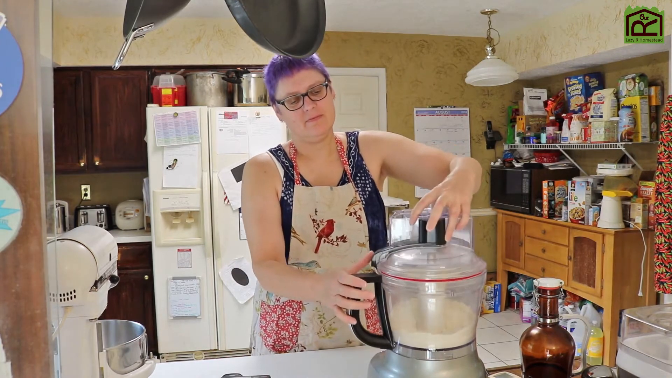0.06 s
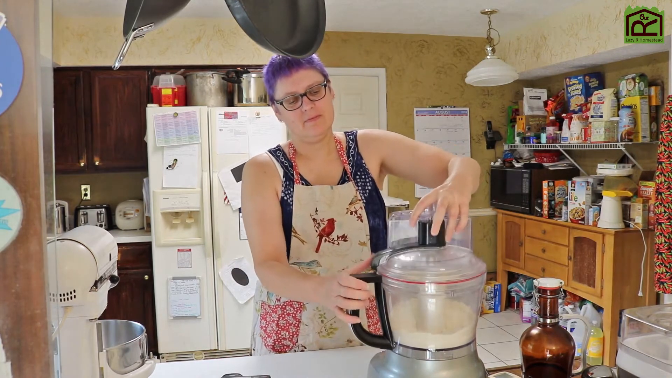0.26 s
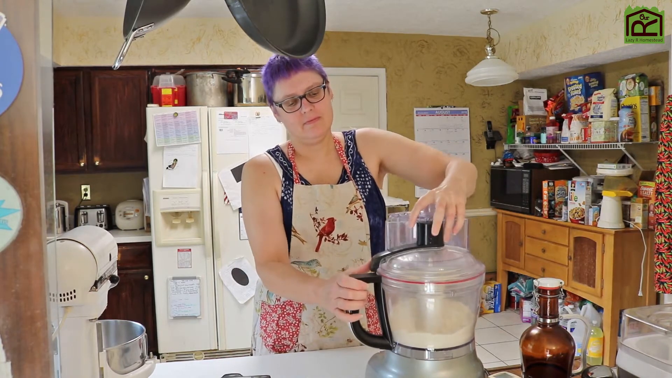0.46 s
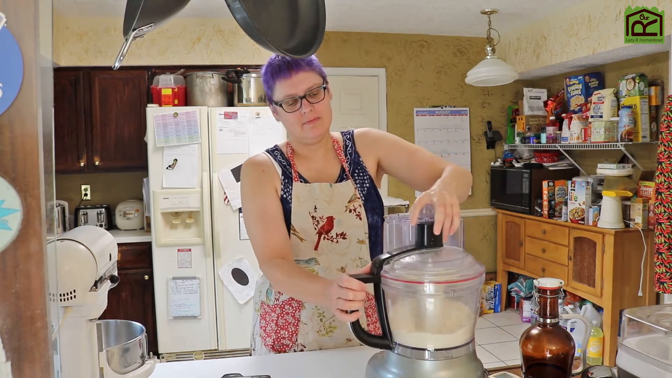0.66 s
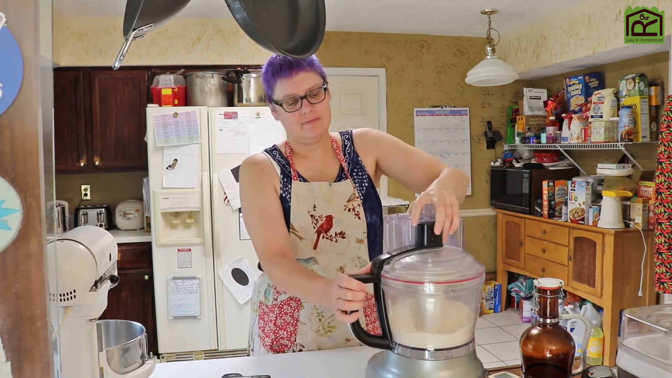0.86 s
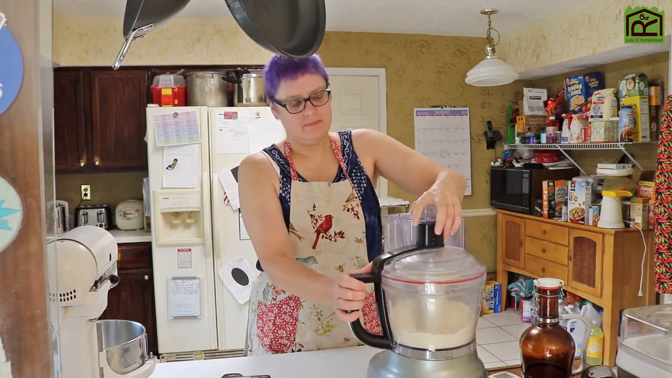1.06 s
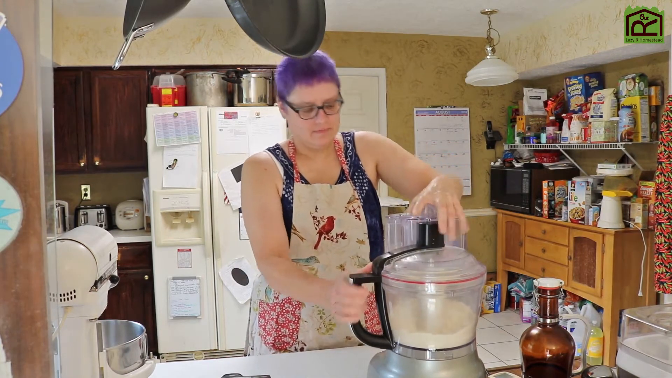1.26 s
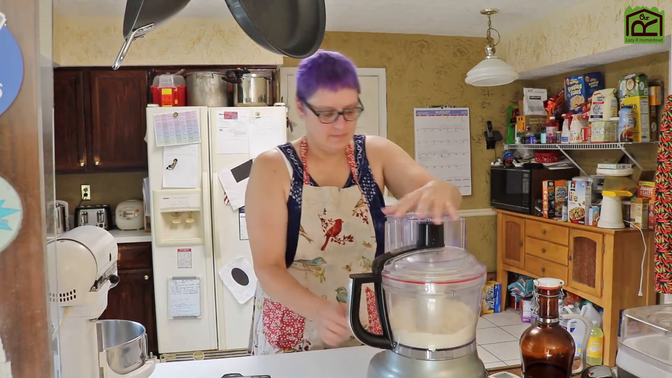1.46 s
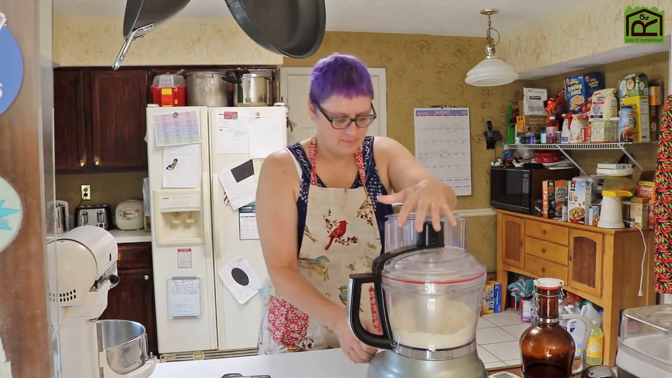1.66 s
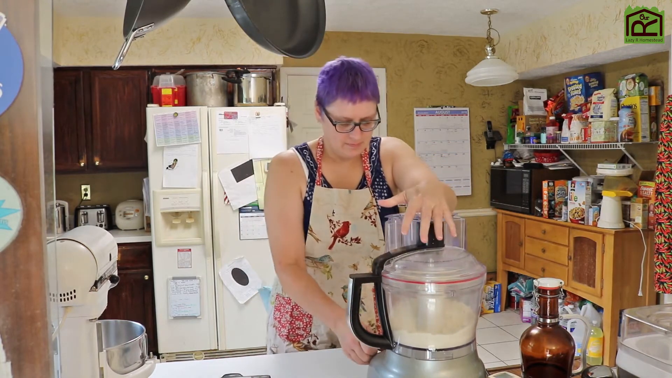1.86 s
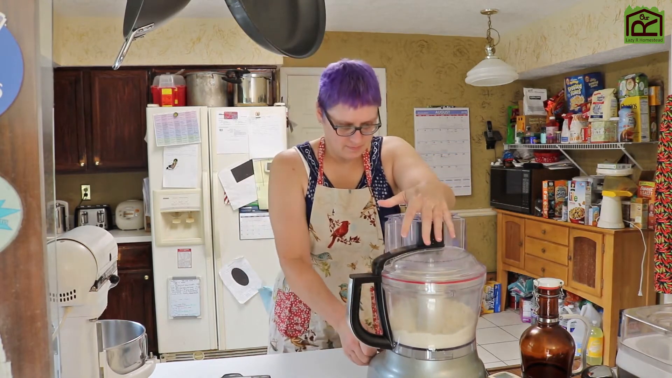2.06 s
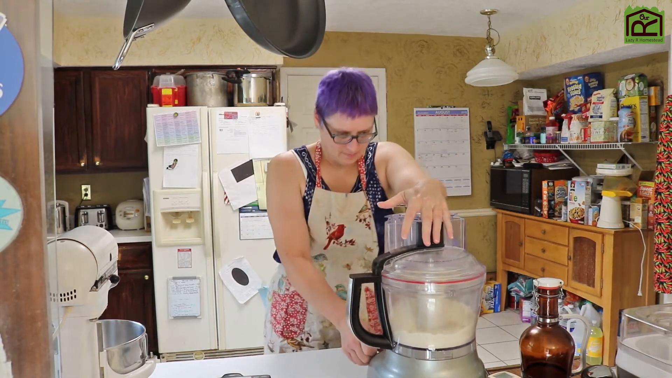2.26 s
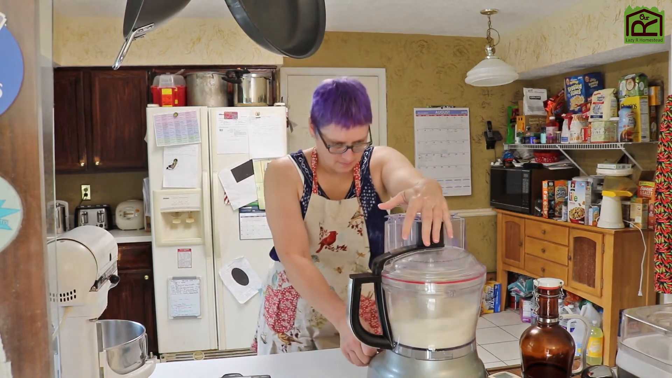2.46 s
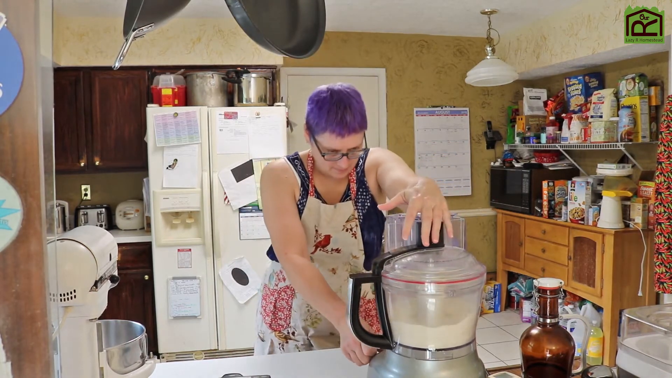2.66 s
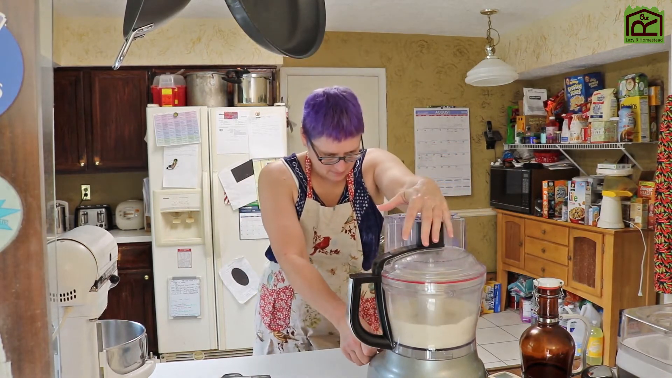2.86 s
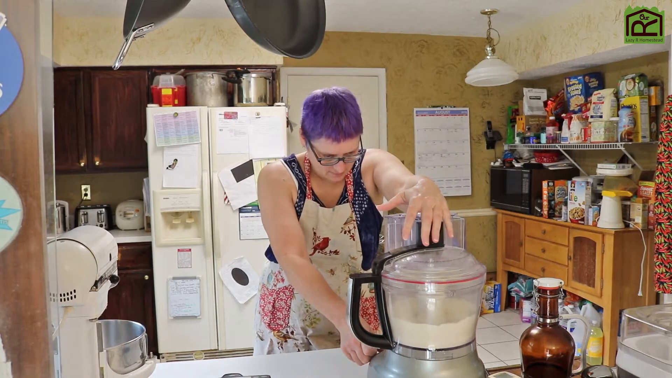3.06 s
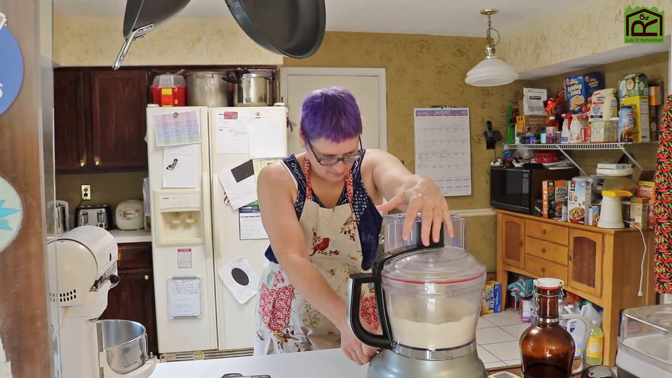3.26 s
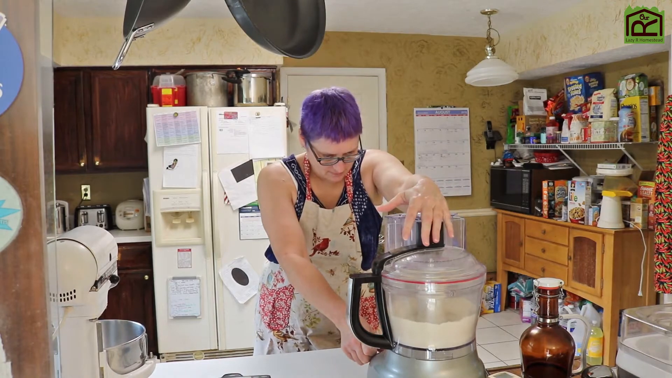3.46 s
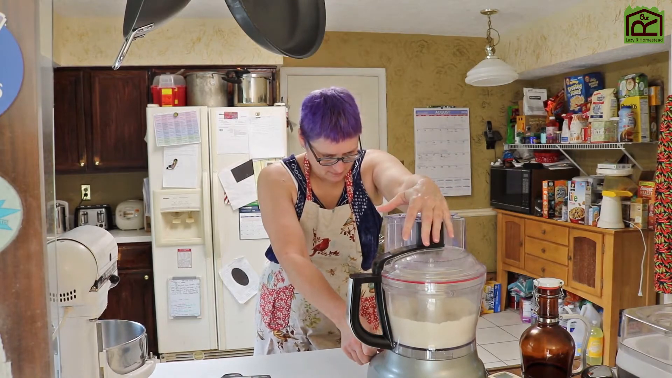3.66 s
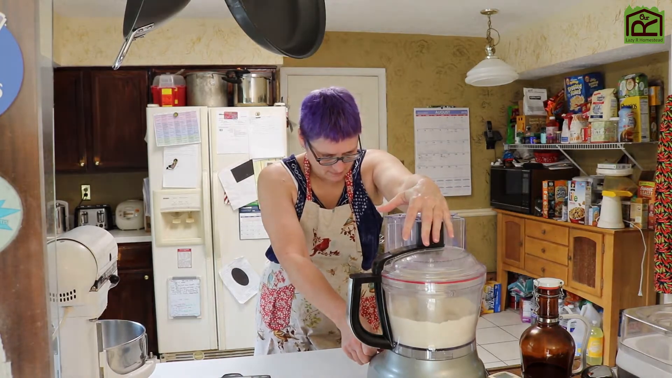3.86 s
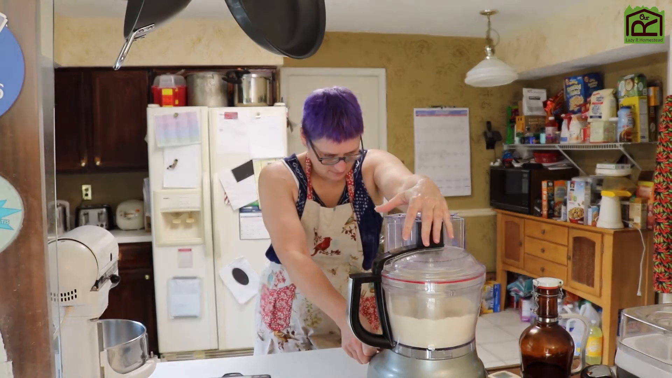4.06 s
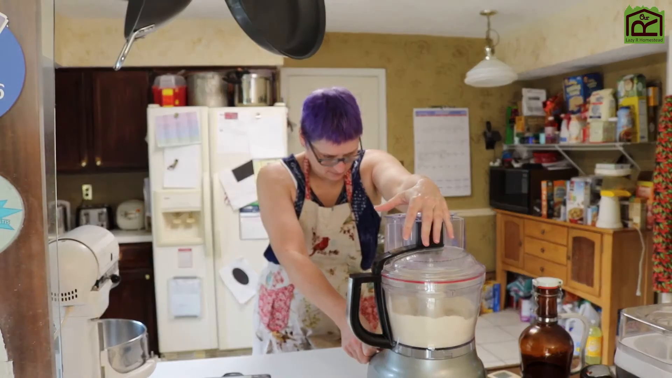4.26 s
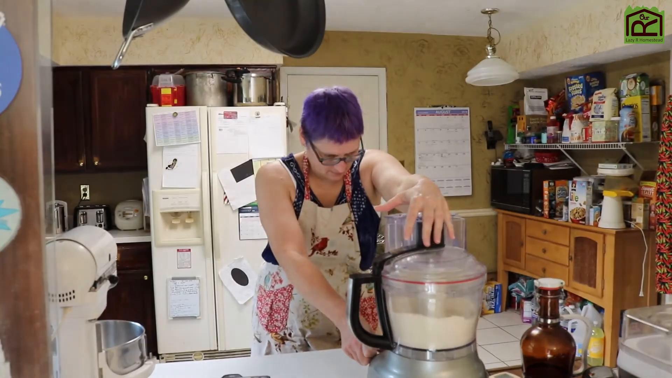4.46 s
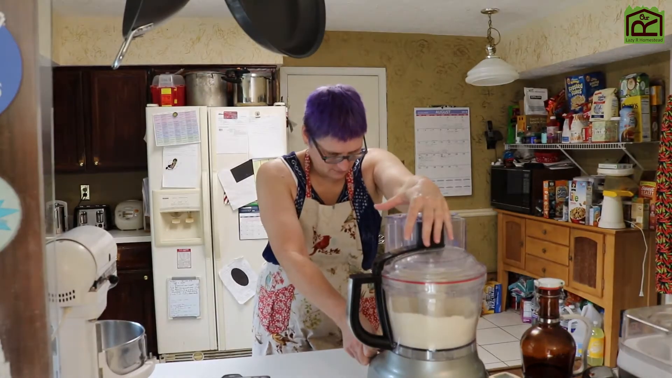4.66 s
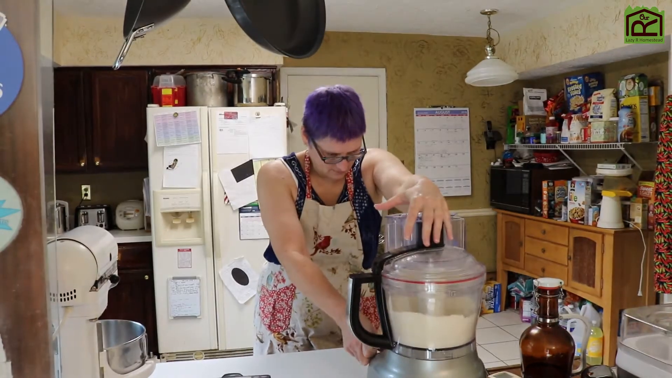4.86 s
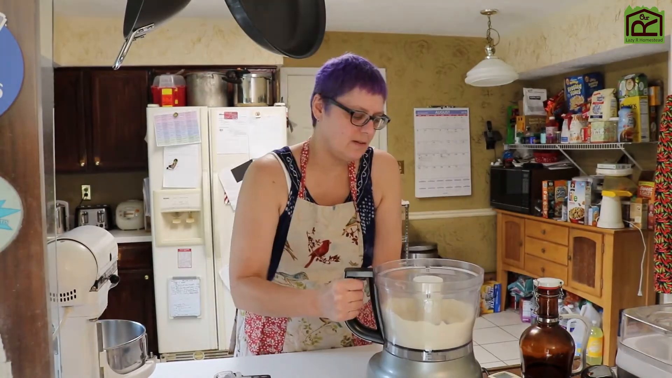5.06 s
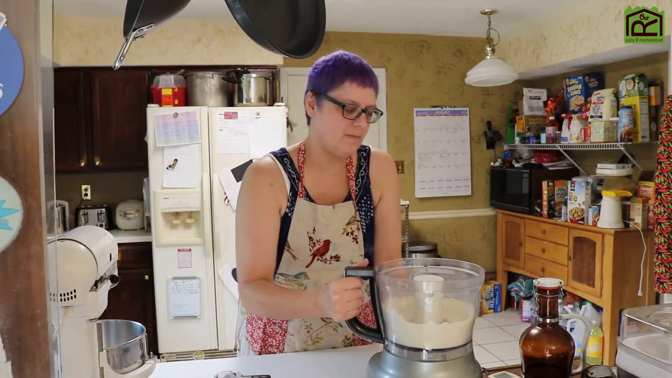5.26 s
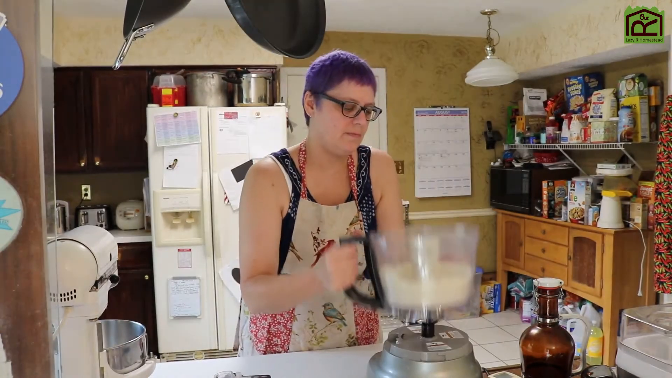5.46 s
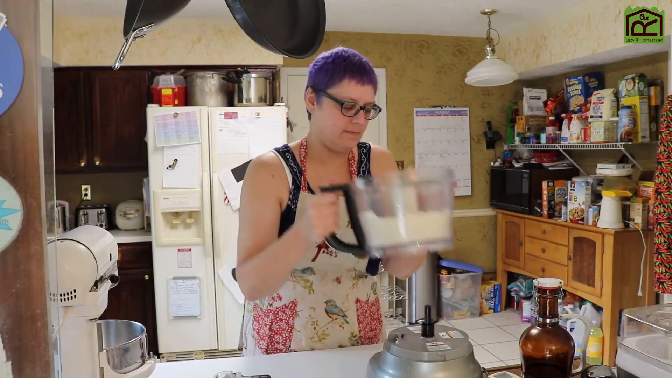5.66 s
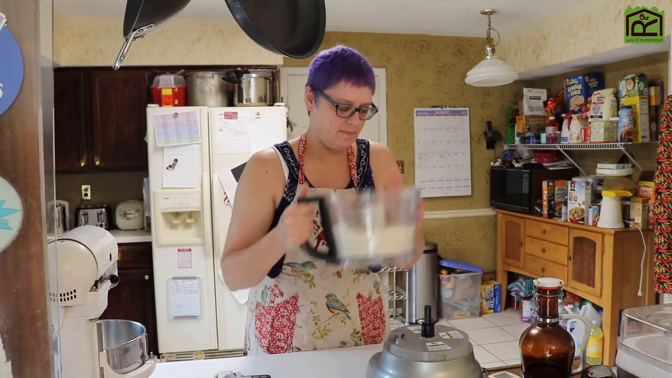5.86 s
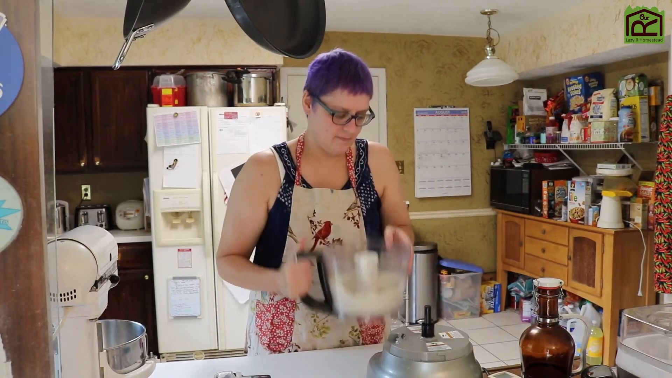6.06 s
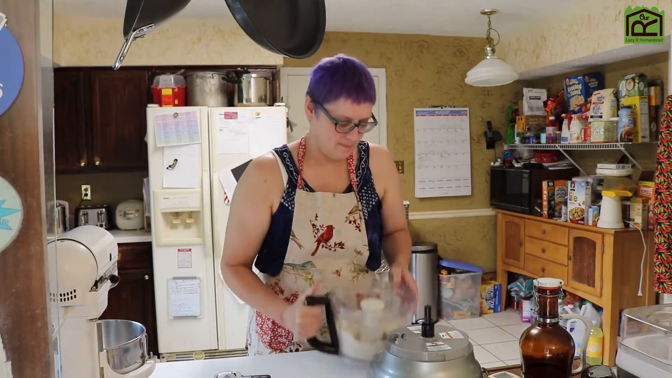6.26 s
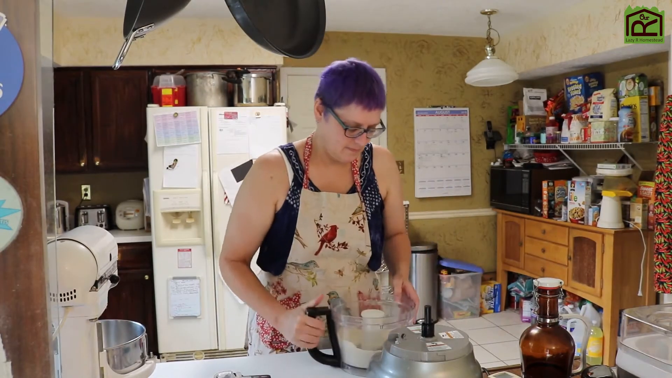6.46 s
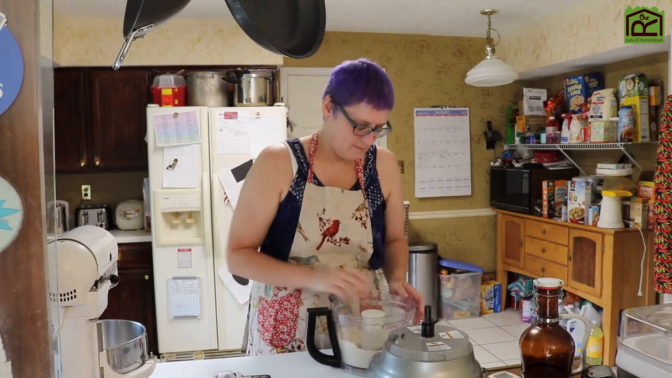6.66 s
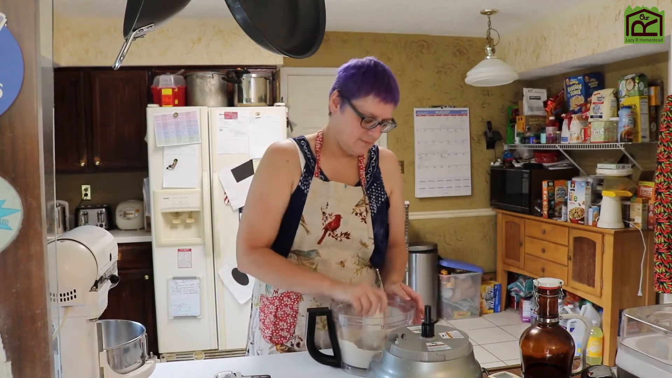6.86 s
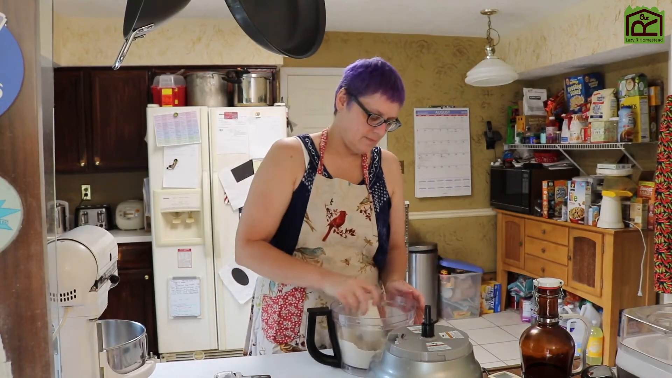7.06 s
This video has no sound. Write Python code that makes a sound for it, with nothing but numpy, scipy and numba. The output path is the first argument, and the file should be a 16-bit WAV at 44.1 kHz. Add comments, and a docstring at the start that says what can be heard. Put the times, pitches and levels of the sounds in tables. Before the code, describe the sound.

Plastic lid is wiggled and clicked, a food processor whirrs in flour, jumps to high-pitched fast-forward, stops, then loud lid, bowl and blade knocks.

```python
"""Food processor in a kitchen

The lid is wiggled and locked, then the induction motor spins up in flour: mains hum, shaft whine, whirr.
The run jumps to fast-forward, six times higher, stops and starts once more; then at normal speed the lid
is wrenched off, the bowl is set on the counter and the blade knocks in it: pushes into ringing bodies.
Two microphones hear it, the right one slightly first; a limiter squashes the loud knocks.
"""
import sys
import numpy as np
from scipy import signal
from scipy.fft import rfft, irfft, next_fast_len
from scipy.io import wavfile
from scipy.ndimage import map_coordinates
from numba import njit

SR = 44100
rng = np.random.default_rng(int(sys.argv[2]) if len(sys.argv) > 2 else 0)


def digitize_waveform(pressure):
    """Quantize a signal to 16-bit integers and store it at the path in sys.argv[1].

    Rows of a 2-D input are taken as channels; values are limited to [-1, 1].
    """
    field = np.atleast_2d(pressure).T
    bounded = np.clip(field, -1, 1)
    quanta = np.round(bounded * 32767).astype(np.int16)
    wavfile.write(sys.argv[1], SR, quanta)


N = 313551
FAST_FROM, FAST_TO, FAST_RATE = 3.912, 5.01, 6  # fast-forward: from s, to s, times normal speed

# Whirr of air and of flour, shape only: f/Hz, relative level/dB per Hz
AIR_SPECTRUM = [(24, -48), (40, -21), (90, -4), (125, -14), (235, -14.5), (419, -9), (475, -12), (559, -8),
                (2130, -9.5), (3000, -4.5), (3900, -7), (6600, -120)]
FLOUR_SPECTRUM = [(1410, -17), (2400, -10), (2720, -9), (3020, -6), (3230, -10.5), (3600, -2), (4240, -4),
                  (4750, -4.5), (5300, -2.5), (6200, -7.5), (7800, -8), (9330, -21.5), (12100, -19.5),
                  (15500, -69)]
# Buzz of the straining motor before it breaks loose, shape only: f/Hz, relative level/dB per Hz
STALL_SPECTRUM = [(60, -7), (240, -4), (500, 7), (800, -6), (2100, 3), (3000, -5), (3700, -1.5),
                  (6000, -9.5), (10000, -33), (14000, -50)]
# Whine lines at normal speed: multiple of the shaft, relative level/dB
SHAFT_LINES = [(2, -49.5), (5, -52), (24, -50), (27, -50), (28, -41), (32, -44), (36, -44), (38, -50),
               (39, -48), (42, -48), (43, -47), (44.5, -48), (45, -49), (46, -50), (47, -50), (48, -46),
               (54, -45), (55, -49), (56, -42), (58, -50), (64, -48), (70, -48), (72, -43), (74, -50),
               (76, -46), (77, -46), (80, -46), (81, -45), (85, -48), (88, -49), (92, -49), (94, -45),
               (102, -49), (108, -46), (110, -43.5)]
AIR_DB, FLOUR_DB = -32.5, -25.2  # at full speed, before the fling
AIR_REPEAT, FLOUR_REPEAT = .6, .45  # share of the whirr that repeats with the shaft
SPEED_LAW = 2.0  # whirr amplitude grows with this power of speed
INRUSH_DB = 4.5  # how much louder the iron hums on the starting current
MAINS_HZ = 60


def motor():
    """The motor buzzes, breaks loose, flings the flour about and settles."""
    speed, current, inrush, fling = drive()
    turns = np.cumsum(speed * (1 + .0014 * wobble(25))) / SR
    rush = (speed / FULL_SPEED) ** SPEED_LAW
    air = rush * amp(AIR_DB + 6.1 * fling) * whirr(turns, AIR_SPECTRUM, repeat=AIR_REPEAT, size=1700)
    flour = rush * amp(FLOUR_DB + 2.6 * fling) * whirr(turns, FLOUR_SPECTRUM, repeat=FLOUR_REPEAT, size=1700)
    blade_beat_db = 0.66 * np.sin(4 * np.pi * turns)  # two blades a turn
    out = (air + flour) * amp(blade_beat_db + 1.06 * wobble(40))
    lines = whine(speed, turns, SHAFT_LINES, steepness=1.9, waver_db=3, waver_rate=18)
    out += amp(5.6 + 3 * fling) * lines
    out += amp(-29.5) * inrush * whirr(MAINS_HZ * clock(), STALL_SPECTRUM, repeat=0.76, size=1100)
    out += current * amp(INRUSH_DB * inrush) * hum(1)
    return out * between(RUNS[0][0], FAST_FROM)


# Whirr in fast-forward, shape only: f/Hz, relative level/dB per Hz
FAST_SPECTRUM = [(100, -25.5), (350, -20), (603, -24.5), (1140, -16.5), (1410, -14.5), (2540, -13.5),
                 (2900, -10), (5500, -11), (6700, -14), (9000, -8), (10600, -10), (12800, -8), (13700, -7),
                 (15300, -9), (16000, -20)]
# Level of that whirr at full speed, before the fling: t/s, level/dB
FAST_LEVEL = [(3.92, -34.5), (4.45, -29), (4.8, -28)]
# Whine lines in fast-forward: multiple of the shaft, relative level/dB
FAST_LINES = [(1, -46), (4, -54), (6, -53), (7, -53), (12, -52), (14, -52), (17, -49), (18, -51), (22, -53),
              (24, -45), (26, -47), (28, -38.5), (29, -49), (30, -46), (36, -42), (37, -42.5), (38, -46),
              (39, -43), (40, -47), (42, -46), (42.5, -46), (43, -51), (45, -50), (45.5, -46), (46, -42),
              (48, -38), (49.5, -50), (50, -49), (51, -51)]
# The blade's drone under the whine: multiple of the shaft, relative level/dB
DRONE_LINES = [(1.5, -52), (2, -51), (2.5, -53), (3, -58)]
FAST_REPEAT = .4  # share of the whirr that repeats with the shaft at full speed
STALL_DB = -35.5  # whirr level that the starting current adds


def fast_motor():
    """In fast-forward shaft and mains sound six times higher; the lines fade away from full speed."""
    speed, current, inrush, fling = drive()
    turns = np.cumsum(FAST_RATE * speed * (1 + 0.00026 * wobble(90))) / SR
    rush = (speed / FULL_SPEED) ** SPEED_LAW
    level = np.hypot(rush * amp(curves(FAST_LEVEL)[0] + 3.8 * fling), amp(STALL_DB) * inrush)
    settled = (speed / FULL_SPEED) ** 24  # near 1 only close to full speed
    noise_part = whirr(turns, FAST_SPECTRUM, repeat=FAST_REPEAT * settled, size=280)
    out = level * amp(1.2 * wobble(240)) * noise_part
    lines = whine(speed, turns, FAST_LINES + DRONE_LINES, steepness=4.4, waver_db=2.0, waver_rate=70)
    out += amp(1.2) * np.sqrt(current) * lines
    out += current * amp(-1.0 + INRUSH_DB * inrush) * hum(FAST_RATE)
    return out * between(FAST_FROM, FAST_TO)


# Narrow resonances of the bowl that lift each line climbing through: f/Hz, half width/Hz, lift/dB
BOWL_PEAKS = [(1325, 24, 8), (1391, 8, 8), (1432, 10, 4), (1685, 25, 5), (1893, 14, 6), (2100, 90, 6),
              (2500, 60, 4.5), (2690, 50, 8), (2775, 25, 5), (3540, 120, 8.5), (4705, 30, 6)]


def whine(speed, turns, orders, steepness, waver_db, waver_rate):
    """Fan, rotor slots and blade sing on shaft multiples, louder in the bowl's resonances."""
    hz = np.arange(SR // 4)
    lift = amp(sum(db * np.exp(-((hz - centre) / width) ** 2) for centre, width, db in BOWL_PEAKS))
    out = 0
    for order, db in orders:
        growth = (speed / speed.max()) ** (steepness * max(order / 48, .6))  # high lines need more speed
        level = amp(db) * growth * lift[(order * speed).astype(int)]
        out = out + level * tone(order * turns, waver_db, waver_rate, min(order / 42, .65))
    return out


# Hum of the iron at normal speed: f/Hz, level/dB relative to running current
HUM_LINES = [(240, -44), (480, -37), (720, -51.5), (960, -48.5)]


def hum(rate):
    """The iron buzzes on multiples of twice the mains frequency."""
    return sum(amp(db) * tone(120 * round(hz / 120) * rate * clock(), 1.5, 12, .18) for hz, db in HUM_LINES)


# How alike the two microphones hear the whirr: f/Hz, likeness (1 = identical)
MOTOR_ALIKE = [(150, 0.8), (500, 0.63), (1200, 0.99), (4000, 0.44), (12000, 0.094)]


def whirr(turns, spectrum, repeat, size):
    """Coloured noise of rms near 1; a share of it repeats every second turn."""
    repeat = np.clip(repeat, 0, 1)
    pattern = signal.resample(rng.standard_normal((2, size)), 8 * size, axis=1)
    position = (turns / 2 % 1 * pattern.shape[1]).astype(int)
    locked = pattern[:, position]
    return spread(np.sqrt(repeat) * locked + np.sqrt(1 - repeat) * noise(), MOTOR_ALIKE, spectrum)


def machine_time(s):
    """Seconds as the machine lives them: they pass faster in fast-forward."""
    return s + (FAST_RATE - 1) * np.maximum(s - FAST_FROM, 0)


# The switch: on t/s, off t/s
RUNS = [(2.23, 4.555), (4.697, 4.948)]
# The shaft leaps up from rest, then gains its last turns as the flour loosens; times are machine time
FULL_SPEED, FLOUR_DRAG = 51.165, 9  # turns per second
LOOSEN_S, SPIN_UP_S, SPIN_UP_SHAPE = .735, .116, 1.64
COAST_S = .5  # run-down after switching off
INRUSH_S = 0.32  # how long the starting current lasts
FLING_AT_S, FLING_S = 0.32, 0.16  # the blade throws up resting flour: time after switching on, spread


def drive():
    """From the switch follow shaft speed, mains current, starting inrush and flung flour."""
    speed, current, inrush, fling = np.zeros((4, N))
    now = machine_time(clock())
    for on, off in RUNS:
        age = np.maximum(now - machine_time(on), 0)
        coast = np.maximum(now - machine_time(off), 0)
        spin_up = 1 - np.exp(-(age / SPIN_UP_S) ** SPIN_UP_SHAPE)
        run_down = np.exp(-(coast / COAST_S) ** 2)
        speed += (FULL_SPEED - FLOUR_DRAG * np.exp(-age / LOOSEN_S)) * spin_up * run_down
        powered = (age > 0) * np.exp(-coast / 0.029)
        current += powered
        inrush += powered * np.exp(-(age / INRUSH_S) ** 6)
        fling += powered * np.exp(-.5 * ((age - FLING_AT_S) / FLING_S) ** 2)
    return speed, current, inrush, fling


# Housing resonances at normal speed: t/s after switching on, length/s, f/Hz, width/Hz, level/dB
HOUSING_RINGS = [(0.166, 0.024, 1482, 28, -24), (.24, 0.025, 1015, 60, -30), (.14, 0.022, 1007, 37, -32),
                 (0.18, 0.064, 890, 180, -33), (.215, 0.018, 2090, 110, -25), (.26, 0.025, 2280, 250, -28),
                 (.3, 0.084, 1290, 100, -34), (0.092, 0.032, 240, 13, -33), (.075, 0.045, 393, 34, -41),
                 (.18, 0.024, 488, 19, -26.5), (.15, .025, 1900, 80, -29.5)]


def housing():
    """Each start climbs through the housing's resonances, higher and shorter in fast-forward."""
    rows = []
    for on, off in RUNS:
        rate = FAST_RATE if on > FAST_FROM else 1
        for age, length, hz, width, db in HOUSING_RINGS:
            rows.append((on + age / rate, length / rate, hz * rate, width * rate, db))
    return surges(rows)


# Heavy contacts: t/s, relative level/dB, contact length/s
THUDS = [(.001, -8, .012), (.18, -21.5, 0.045), (.315, -20, 0.011), (.603, -19, 0.0039),
         (.609, -15.5, 0.0025), (.616, -8, 0.0023), (2.08, -21.5, 0.03), (5.124, -3.5, 0.01),
         (5.137, -6, 0.014), (6.435, 2, 0.0092), (6.543, -11.5, 0.006)]
# Their body, shape only: f/Hz, relative level/dB
THUD_BODY = [(24, -36), (40, -10), (80, -1), (120, -9.5), (180, 6), (270, 1.5), (380, -0.5), (680, -5.5),
             (896, -1), (1040, -11.5), (1340, -5), (2980, -18), (8990, -33), (16000, -52)]
# The machine rocks on its rubber feet: t/s, length/s, f/Hz, width/Hz, level/dB
FEET_THUMPS = [(.626, 0.01, 158, 120, -24), (.67, .03, 80, 50, -36.5)]


def heavy_contacts():
    """Blunt pushes into a heavy body, and swells as the machine rocks on its feet."""
    return knocks(THUDS, THUD_BODY, wet_db=1.0, chatter=1.53) + surges(FEET_THUMPS)


# Knocks of the lid: t/s, relative level/dB, contact length/s
LID_KNOCKS = [(5.0472, 10.5, 0.0032), (5.093, -9, 0.015), (5.125, -5.5, 0.098)]
# The lid snaps free and grinds round: t/s, relative level/dB, contact length/s
LID_TWIST = [(5.012, -2.5, 0.0023), (5.016, -12, 0.027)]
# Bodies of knock and twist, shape only: f/Hz, relative level/dB
LID_BODY = [(24, -36), (40, -13), (118, -30), (171, -12), (300, -2.5), (420, 1), (620, 1.5), (918, -9),
            (1100, -9), (1520, -4), (6490, -20.5), (16000, -58)]
TWIST_BODY = [(35, -41), (60, -10), (515, -15), (1110, -15), (1400, -7), (2400, -4.5), (7230, -10),
              (11800, -14.5), (16000, -37)]
# The lid scrapes, thumps and rattles in short resonant swells: t/s, length/s, f/Hz, width/Hz, level/dB
LID_SWELLS = [(.44, 0.078, 3700, 2280, -38), (.54, 0.018, 3360, 2000, -37), (.614, 0.0092, 910, 150, -26),
              (.8, 0.04, 837, 260, -37.5), (1.0, 0.014, 1070, 700, -41), (1.165, 0.03, 3600, 2360, -36.5),
              (5.08, 0.012, 710, 350, -10), (5.145, 0.008, 380, 260, -13.5),
              (5.203, 0.024, 540, 170, -25.5), (5.472, 0.0094, 2150, 2000, -41.5)]


def lid():
    """The plastic lid knocks, twists with long chatter and swells briefly in resonances."""
    out = knocks(LID_KNOCKS, LID_BODY, wet_db=2.0, chatter=1.0)
    out += knocks(LID_TWIST, TWIST_BODY, wet_db=8.0, chatter=4.9)
    return out + surges(LID_SWELLS)


# The bowl meets the counter: t/s, relative level/dB, contact length/s
BOWL_KNOCKS = [(6.4128, 1.4, 0.0018)]
# Its body, shape only: f/Hz, relative level/dB
BOWL_BODY = [(24, -46), (40, -20), (110, -23), (163, 4), (269, -3), (350, 6), (480, 11), (690, 4),
             (1070, -11.5), (1410, -7), (6330, -43), (14100, -44), (16000, -90)]
# Its ringing: f/Hz, relative level/dB, t60/s
BOWL_MODES = [(345, -4, .45), (458, 0, .4), (689, -1, .36), (6062, -33, .35), (7547, -27, .25)]


def bowl():
    """One push into the bowl, whose modes ring on."""
    return knocks(BOWL_KNOCKS, BOWL_BODY, wet_db=7.0, chatter=0.69, modes=BOWL_MODES, ring_db=-27.5)


# Hard edge of the two loudest knocks: t/s, relative level/dB, contact length/s
CRACKS = [(5.0473, 2, 0.001), (6.4129, 1, 0.00068)]
# Its colour, shape only: f/Hz, relative level/dB
CRACK_BODY = [(120, -50), (200, -3.5), (641, 6), (1020, 1.5), (1900, -2.5), (2800, -4.5), (3400, -6.5),
              (4920, -11), (6050, -20), (12000, -36), (16000, -63)]


def hard_edges():
    """A very short contact sharpens the loudest lid and bowl knocks."""
    return knocks(CRACKS, CRACK_BODY, wet_db=3.0, chatter=0.59)


# The blade knocks in the bowl: t/s, relative level/dB, contact length/s
BLADE_KNOCKS = [(6.9688, -5.5, 0.006), (6.981, -10, 0.0033), (7.009, -19, .004), (7.024, -26, 0.0044),
                (7.05, -24, .005)]
# Its body, shape only: f/Hz, relative level/dB
BLADE_BODY = [(100, -24.5), (380, -9), (500, 5), (600, 3.5), (760, -3), (900, -11), (1250, -6), (1520, -16),
              (2000, -10), (2350, -15), (2850, -14.5), (4200, -26), (10500, -36.5), (16000, -50)]
# Its ringing: f/Hz, relative level/dB, t60/s
BLADE_MODES = [(612, 4, .26), (675, -6, 0.28), (740, -1, 0.3), (1265, -8, 0.26), (2070, -11, .16),
               (2800, -16, 0.25)]


def blade():
    """Chattering contacts set the blade's modes ringing."""
    return knocks(BLADE_KNOCKS, BLADE_BODY, wet_db=-2.0, chatter=11.0, modes=BLADE_MODES, ring_db=-26.5)


# Light plastic contacts: t/s, relative level/dB, treble tilt/dB per decade
CLICKS = [(.178, -32.5, -7), (.221, -26.5, 0), (.607, -18, -9), (.694, -27, 3), (.752, -21.5, 2),
          (.793, -32.5, -31), (.906, -33, -12), (1.009, -34.5, -15), (1.029, -40.5, 14), (1.077, -40.5, 12),
          (1.219, -33.5, 15), (1.357, -39, 10), (1.405, -30.5, -10), (1.453, -40, -19), (1.594, -36.5, -1),
          (1.779, -44.5, -13), (1.803, -54, -17), (2.126, -36.5, 3), (2.231, -23.5, 3), (4.699, -33, -2),
          (5.1, -16, 2), (5.717, -47, 32), (6.496, -23, 1)]
# Their body before the tilt, shape only: f/Hz, relative level/dB
CLICK_BODY = [(120, -44), (200, -25.5), (821, -1), (1370, -6.5), (1710, -3.5), (2560, -3), (3430, -1.5),
              (4040, -5), (5940, -11), (13100, -26.5), (16000, -78)]
CONTACT_S = 0.0091  # chatter of a light contact


def clicks():
    """Lid tabs, rim and switch tick, each with its own brightness."""
    out = np.zeros((2, N))
    for s, db, treble_db in CLICKS:
        colour = [(hz, level + treble_db * np.log10(hz / 2000)) for hz, level in CLICK_BODY]
        out += knocks([(s, db + 17.0, CONTACT_S)], colour, wet_db=-3.5, chatter=13.0)
    return out


# Hands shift lid and bowl: middle t/s, half length/s, scrape level/dB, rumble level/dB
RUBS = [(.01, 0.12, -39.5, -37.5), (0.39, 0.16, -36.5, -46), (0.576, 0.17, -42.5, -49.5),
        (0.823, 0.081, -51, -61), (1.1, 0.15, -43.5, -51.5), (1.374, 0.081, -47, -59),
        (1.783, 0.93, -54.5, -58.5), (2.1, 0.042, -43.5, -47), (5.373, 0.12, -47.5, -49.5),
        (6.333, 0.042, -50.5, -67), (6.9, 0.046, -51.5, -50)]
# Low rumble of the shifted bowl, shape only: f/Hz, relative level/dB per Hz
RUMBLE_SPECTRUM = [(18, -39), (30, -8), (59, 6.5), (119, -26), (204, 1), (253, -2), (600, -5), (780, -51),
                   (1320, -120)]
TICK_SHARE = .35  # share of the scrape's power that is single catches


def handling():
    """Each shift swells and fades: plastic slides on plastic in small slips and the bowl rumbles."""
    scraping, rocking = np.zeros((2, N))  # power over time
    for s, length, scrape_db, rumble_db in RUBS:
        swell = np.exp(-((clock() - s) / length) ** 2)
        scraping += amp(scrape_db) ** 2 * swell
        rocking += amp(rumble_db) ** 2 * swell
    scrape = unit(spread(noise(), ROOM_ALIKE, SCRAPE_SPECTRUM) * amp(2.8 * wobble(160)))
    scrape = np.sqrt(1 - TICK_SHARE) * scrape + np.sqrt(TICK_SHARE) * ticking()
    rumble = spread(noise(), ROOM_ALIKE, RUMBLE_SPECTRUM)
    return np.sqrt(scraping) * scrape + np.sqrt(rocking) * rumble


# Plastic sliding on plastic, shape only: f/Hz, relative level/dB per Hz
SCRAPE_SPECTRUM = [(240, -31), (400, -3.5), (439, -10), (676, -5), (921, -1), (1270, -5), (4180, -9.5),
                   (7280, -17), (12500, -27), (16000, -55)]
TICKS_PER_S = 90  # on average


def ticking():
    """Tiny catches of plastic on plastic, at random moments and of random size."""
    catches = (rng.random(N) < TICKS_PER_S / SR) * amp(4 * rng.standard_normal(N))
    coloured = signal.fftconvolve(catches, impulse(SCRAPE_SPECTRUM))[:N]
    return unit(in_kitchen(coloured, wet_db=0)[:, :N])


# The quiet kitchen at normal speed, shape only: f/Hz, relative level/dB per Hz
FLOOR_SPECTRUM = [(15, -43), (25, -29), (64, -3), (123, -11.5), (145, -15), (180, -6.5), (263, -14),
                  (1230, -20), (1520, -20.5), (2410, -19.5), (2610, -22), (2840, -21), (16000, -36)]


def room_tone():
    """Steady noise of the quiet kitchen; fast-forward lifts its rumble out of the bass."""
    fast = between(FAST_FROM, FAST_TO)
    lifted = [(hz * FAST_RATE, db) for hz, db in FLOOR_SPECTRUM]
    normal_tone = amp(-53.5) * (1 - fast) * spread(noise(), ROOM_ALIKE, FLOOR_SPECTRUM)
    return normal_tone + amp(-54.0) * fast * spread(noise(), ROOM_ALIKE, lifted)


# The kitchen's reverberation: f/Hz, t60/s
KITCHEN_T60 = [(80, 0.65), (250, 0.51), (600, 0.49), (2000, 0.46), (6000, 0.47), (14000, 0.57)]
# How alike the two microphones hear the room: f/Hz, likeness (1 = identical)
ROOM_ALIKE = [(150, 0.94), (400, 0.83), (900, 0.41), (2500, 0.012), (10000, 0.048)]


def in_kitchen(x, wet_db):
    """The direct sound and a fresh diffuse tail; a higher wet_db sounds farther away."""
    hz, t, z = signal.stft(rng.standard_normal((2, SR * 3 // 4)), SR, nperseg=256)
    fade = amp(-60 * t / along(KITCHEN_T60, hz)[:, None]) * (1 - np.exp(-t / 0.00045))
    tail = spread(signal.istft(z * fade, SR, nperseg=256)[1], ROOM_ALIKE)
    tail *= amp(wet_db) / np.sqrt(tail.shape[1])
    tail[:, 0] += 1  # direct sound
    return signal.fftconvolve(x[None], tail, axes=1)


def knocks(rows, spectrum, wet_db, chatter, modes=(), ring_db=0):
    """Each contact is a push with a short chatter; the body colours it and rings on."""
    out, t, body = np.zeros((2, N)), np.arange(SR // 2) / SR, impulse(spectrum)
    for s, db, length in rows:
        grit = rng.standard_normal(len(t)) * np.exp(-t / length)
        force = chatter * grit / np.linalg.norm(grit) + (t == 0)
        blow = signal.fftconvolve(force, body / np.abs(body).max())[:len(t)] / np.hypot(1, chatter)
        ring = sum(amp(level + ring_db - 60 * t / t60) * np.sin(2 * np.pi * hz * t)
                   for hz, level, t60 in modes)
        add(out, s, in_kitchen(amp(db) * (blow + ring), wet_db))
    return out


def surges(rows):
    """Noise in a resonance swells up for a moment."""
    out = np.zeros((2, N))
    for s, length, hz, width, db in rows:
        t = np.arange(SR // 2) / SR - 1 / 4
        shaking = spread(rng.standard_normal((2, len(t))), ROOM_ALIKE)
        ring = unit(filtered(shaking, lambda f: 1 / (1 + (2 * (f - hz) / width) ** 2)))
        add(out, s - 1 / 4, amp(db) * np.exp(-.5 * (t / length) ** 2) * ring)
    return out


def tone(turns, waver_db, waver_rate, apart):
    """A wavering line of rms 1 that reaches the two microphones out of step."""
    offset = apart * rng.choice([-1, 1]) * np.array([[1], [-1]])
    phase = 2 * np.pi * (turns + rng.random()) + offset
    return np.sqrt(2) * np.sin(phase) * unit(amp(waver_db * wobble(waver_rate)))


def spread(pair, alike, spectrum=((1, 0), (2, 0))):
    """Two unrelated signals become a coloured left and right, scaled by the rms of their middle."""
    def turn(hz):
        """Angle between middle and side that gives the wanted likeness."""
        return np.arccos(np.clip(along(alike, hz), -1, 1)) / 2

    def response(hz):
        """Colour times the shares of middle and side."""
        return amp(along(spectrum, hz)) * [np.cos(turn(hz)), np.sin(turn(hz))]

    mid, side = filtered(pair, response)
    return np.array([mid + side, mid - side]) / np.sqrt(np.mean(mid ** 2))


def impulse(spectrum, size=4096):
    """The causal (minimum-phase) response of a body with this spectrum, energy 1."""
    magnitude = amp(along(spectrum, np.fft.rfftfreq(size, 1 / SR)))
    cepstrum = irfft(np.log(np.maximum(magnitude, 1e-6)))
    cepstrum[1:size // 2] *= 2
    cepstrum[size // 2 + 1:] = 0
    h = irfft(np.exp(rfft(cepstrum)))
    return h / np.linalg.norm(h)


def filtered(x, response):
    """x times a response of frequency."""
    n = x.shape[-1]
    m = next_fast_len(n + 8192)
    return irfft(rfft(x, m) * response(np.fft.rfftfreq(m, 1 / SR)), m)[..., :n]


def noise():
    """Two unrelated white noises."""
    return rng.standard_normal((2, N))


def wobble(rate):
    """A smooth random curve, rate knots a second."""
    return map_coordinates(rng.standard_normal(int(N * rate / SR) + 4), [clock() * rate])


def amp(db):
    """Decibels to gain."""
    return 10 ** (np.asarray(db) / 20)


def unit(x):
    """x scaled to rms 1."""
    return x / np.sqrt(np.mean(x ** 2) + 1e-20)


def clock():
    """The time of every sample in seconds."""
    return np.arange(N) / SR


def along(points, hz):
    """(Hz, value) points read on a log frequency axis."""
    f, v = np.transpose(points)
    return np.interp(np.log(hz + 1), np.log(f + 1), v)


def curves(rows):
    """One value per sample for each column after the time."""
    s, *cols = np.transpose(rows)
    return [np.interp(clock(), s, c) for c in cols]


def between(start, end):
    """A gate with 4 ms edges."""
    return np.clip(np.minimum(clock() - start, end - clock()) / .004 + .5, 0, 1)


def add(out, s, x):
    """Mix x into out from second s."""
    i = max(round(s * SR), 0)
    out[:, i:i + x.shape[-1]] += x[..., :N - i]


RIGHT_LEAD_S = 3e-5  # in the bass; it shrinks above about 3 kHz


def off_centre(x):
    """The processor stands to one side: its sound reaches the right microphone first."""
    sides = np.array([[-1], [1]])
    return filtered(x, lambda hz: np.exp(1j * np.pi * hz * RIGHT_LEAD_S / (1 + (hz / 3000) ** 2) * sides))


def scene():
    """Motor and handling over the kitchen's quiet."""
    by_hand = heavy_contacts() + lid() + bowl() + hard_edges() + blade() + clicks() + handling()
    by_hand *= amp([[.35], [-.35]])  # slightly louder on the left
    return off_centre(motor() + housing() + by_hand) + fast_motor() + room_tone()


@njit
def follow(level, rise, fall):
    """An envelope that closes a set share of the gap at each sample, rising or falling."""
    out, held = np.empty_like(level), 0.
    for i in range(len(level)):
        held += (level[i] - held) * (rise if level[i] > held else fall)
        out[i] = held
    return out


def limited(x, threshold_db, attack, release):
    """Gain drops just after a loud onset and recovers during its tail."""
    held = follow(np.abs(x).max(0), 1 / (attack * SR), 1 / (release * SR))
    return x / np.maximum(held / amp(threshold_db), 1)


TOP_HZ = 16000  # band limit


def record(dry):
    """Behind the microphones: limiter, soft overload, bass cut and band limit."""
    loud = limited(dry, threshold_db=-17.5, attack=0.013, release=0.013)  # times in s
    loud = loud / (1 + (loud / 1.05) ** 4) ** (1 / 4)
    return filtered(loud, lambda hz: (1 - np.exp(-(hz / 32) ** 4)) / (1 + (hz / TOP_HZ) ** 200))


dry = scene()
out = record(dry)
digitize_waveform(out)
```